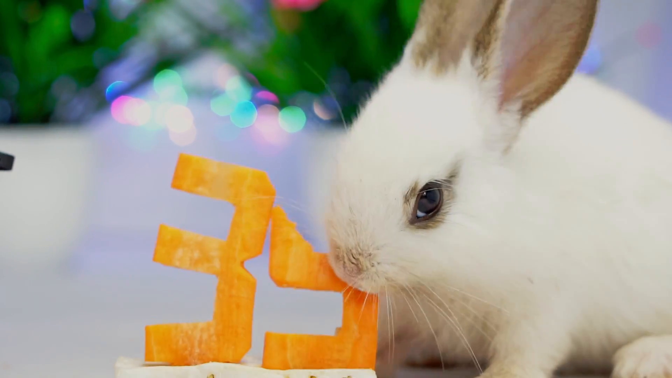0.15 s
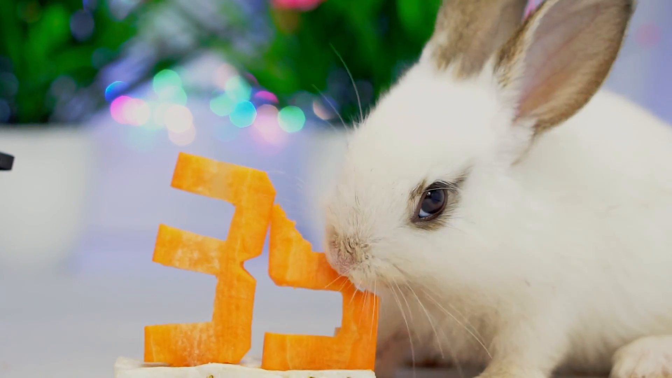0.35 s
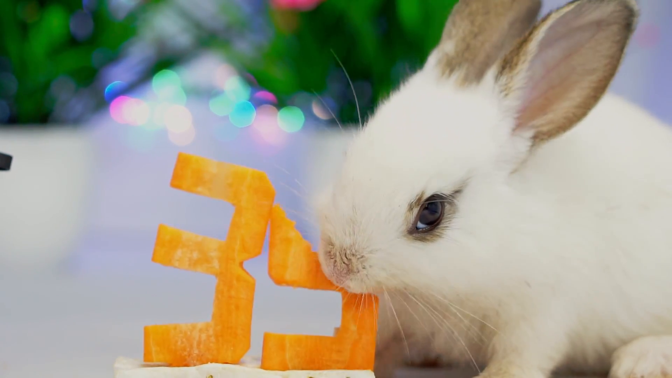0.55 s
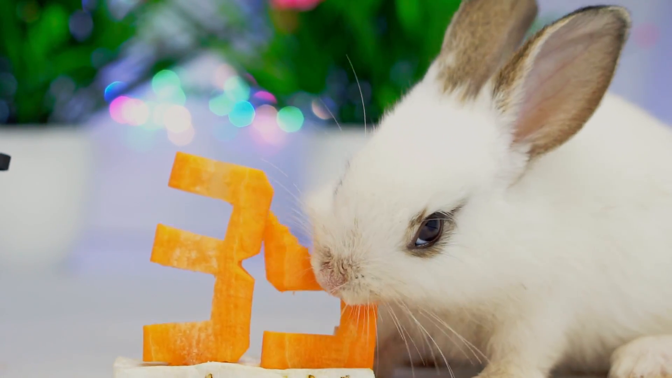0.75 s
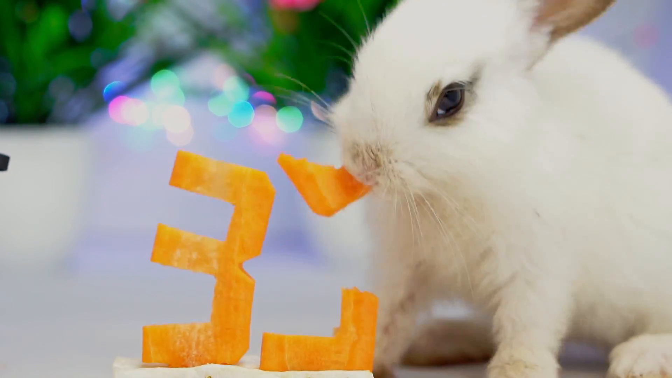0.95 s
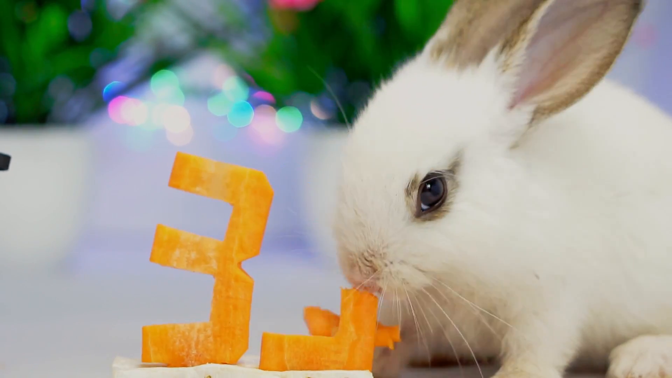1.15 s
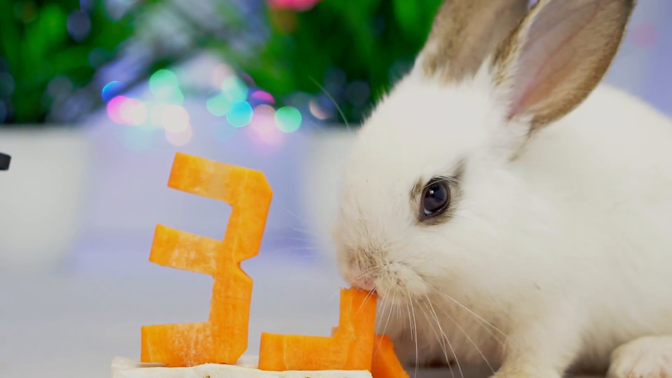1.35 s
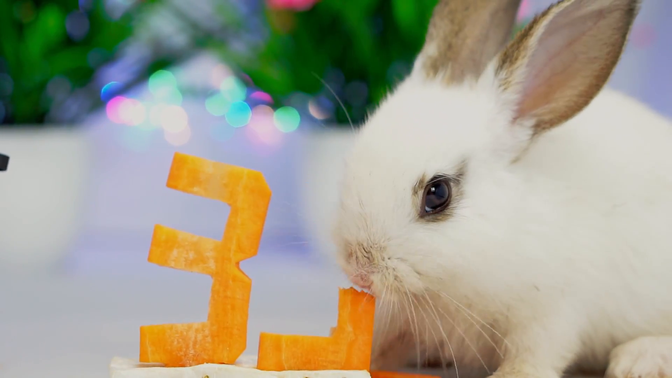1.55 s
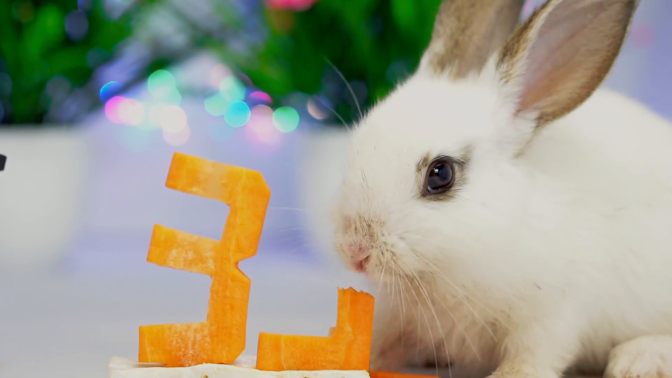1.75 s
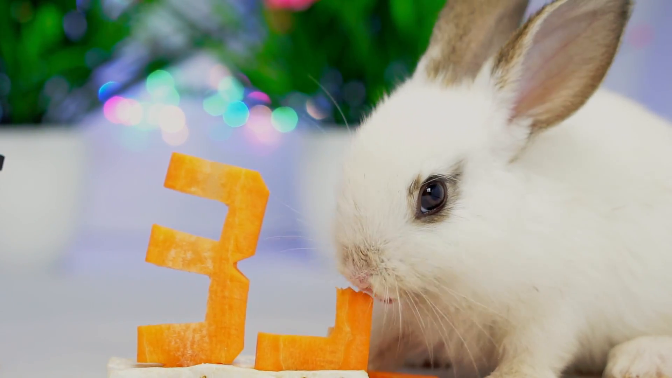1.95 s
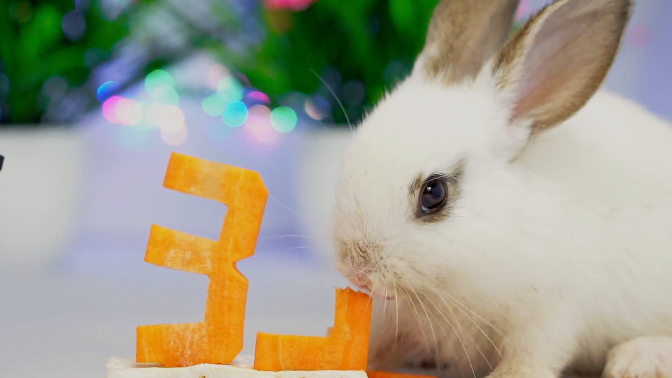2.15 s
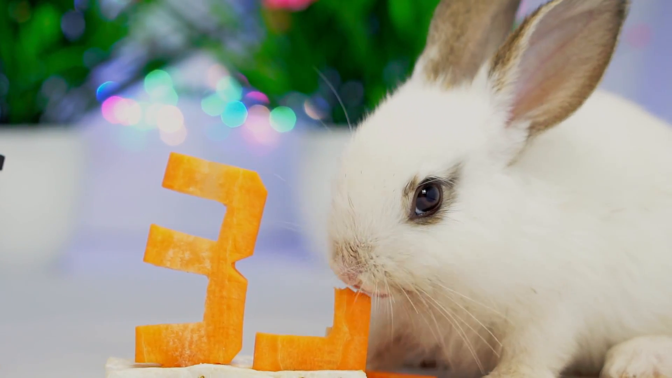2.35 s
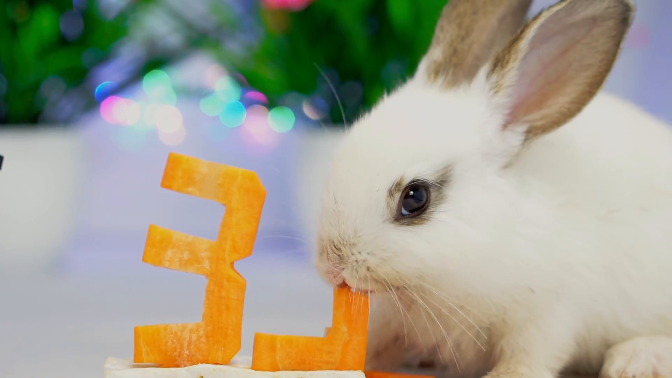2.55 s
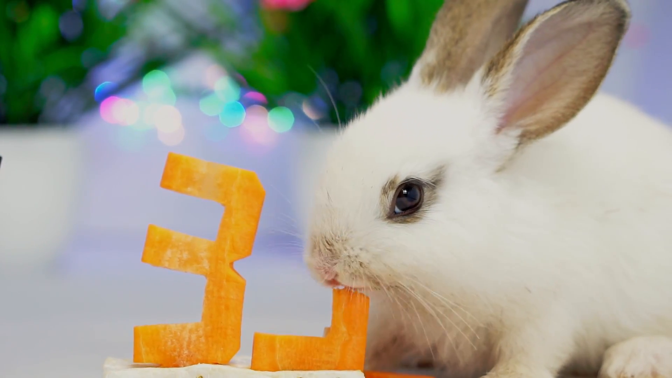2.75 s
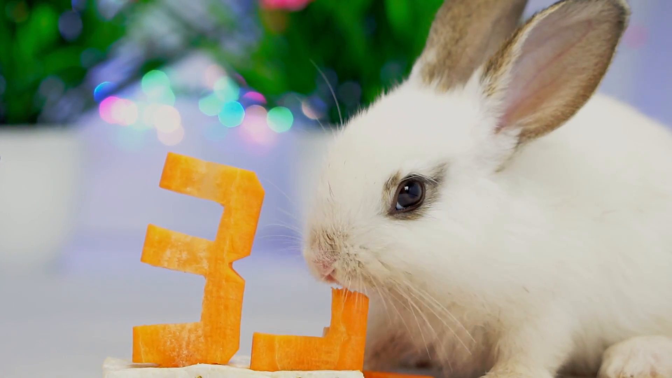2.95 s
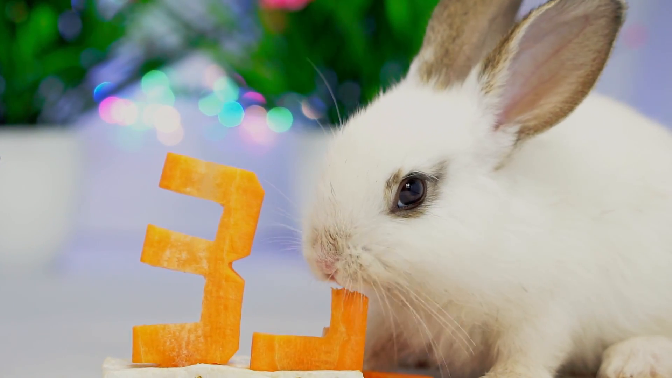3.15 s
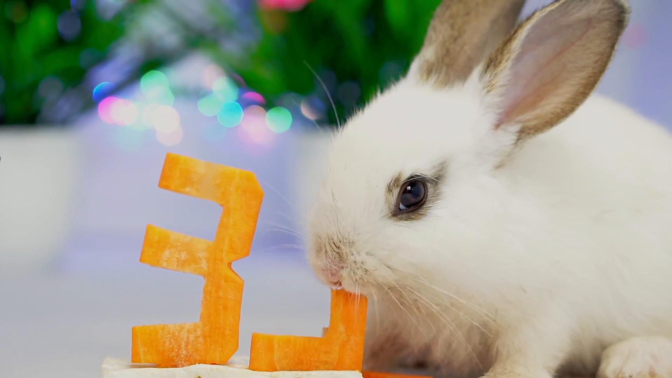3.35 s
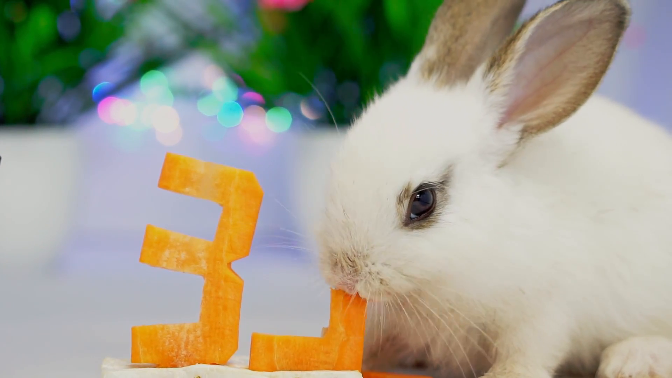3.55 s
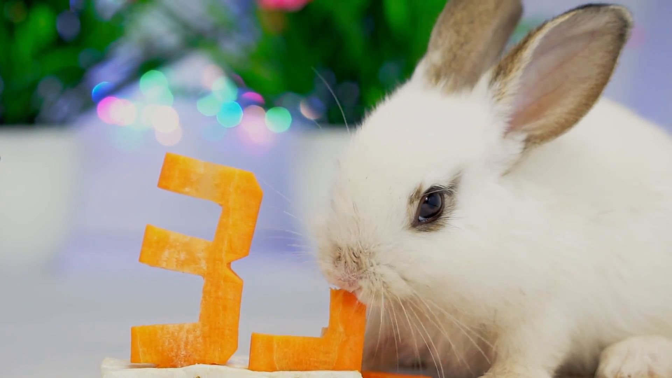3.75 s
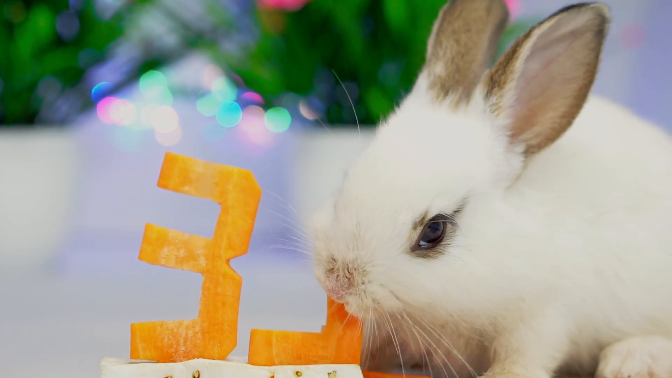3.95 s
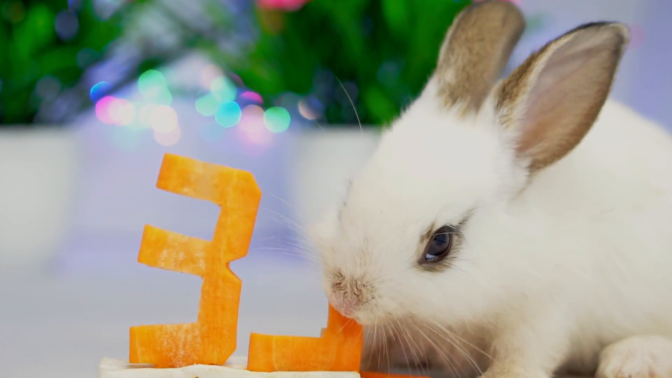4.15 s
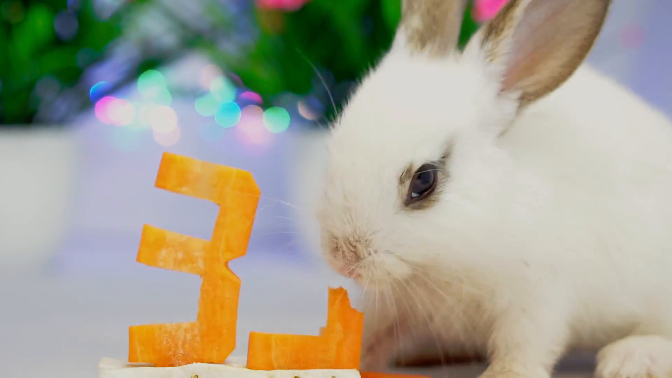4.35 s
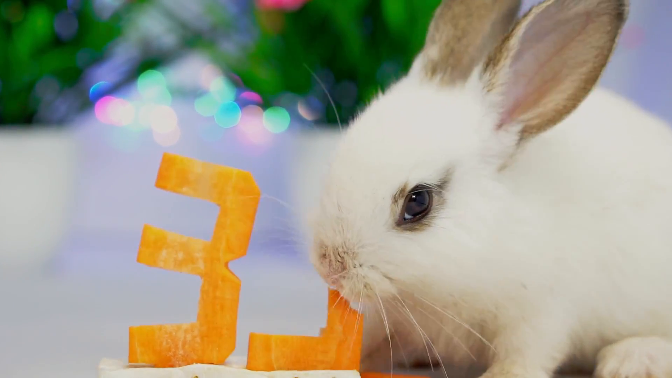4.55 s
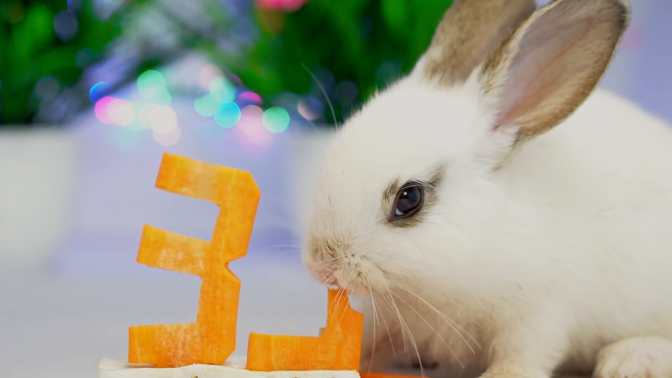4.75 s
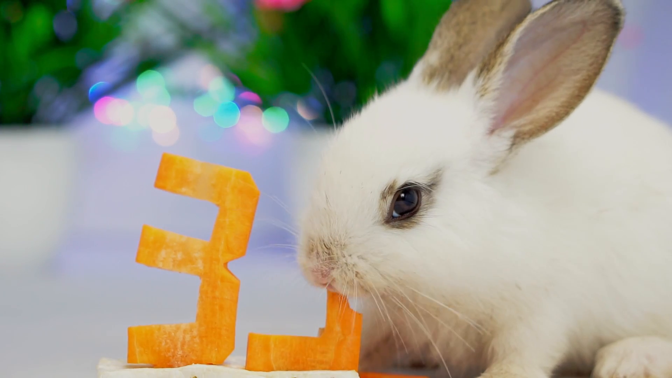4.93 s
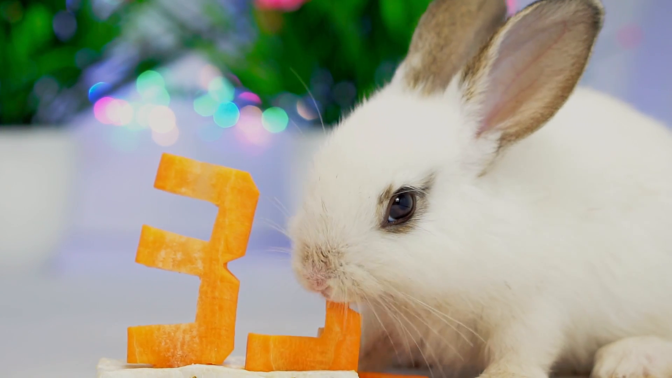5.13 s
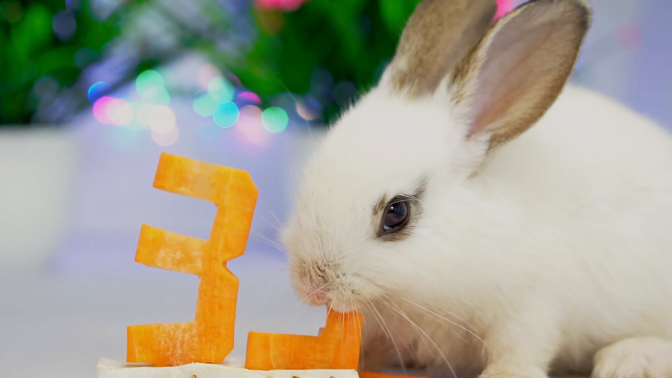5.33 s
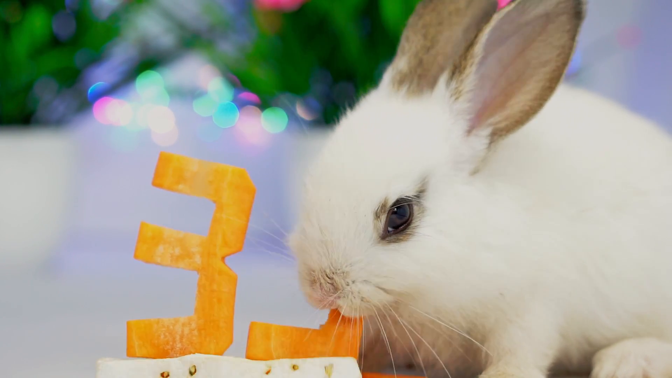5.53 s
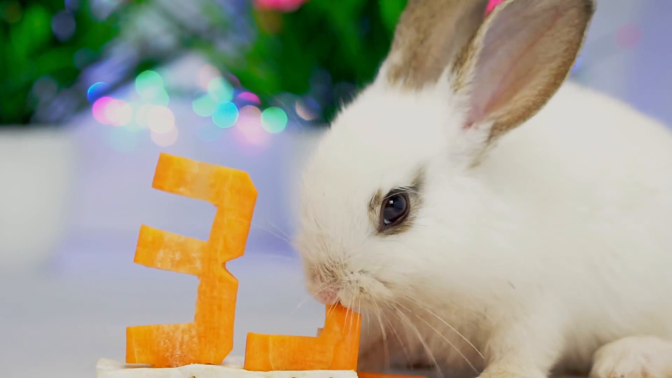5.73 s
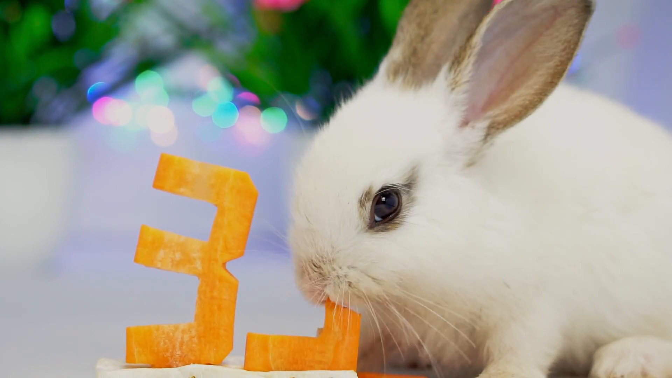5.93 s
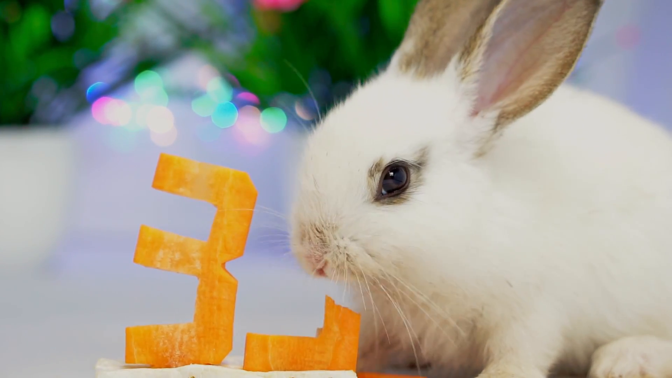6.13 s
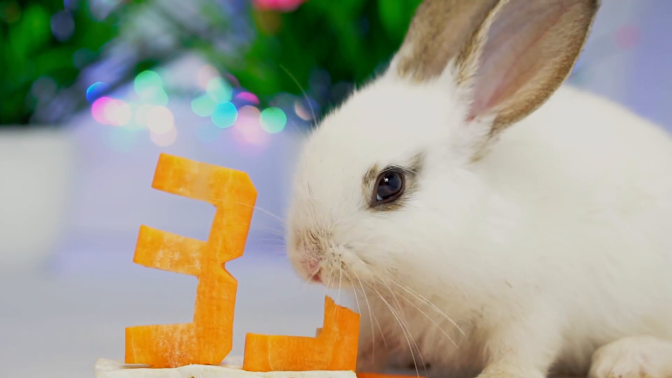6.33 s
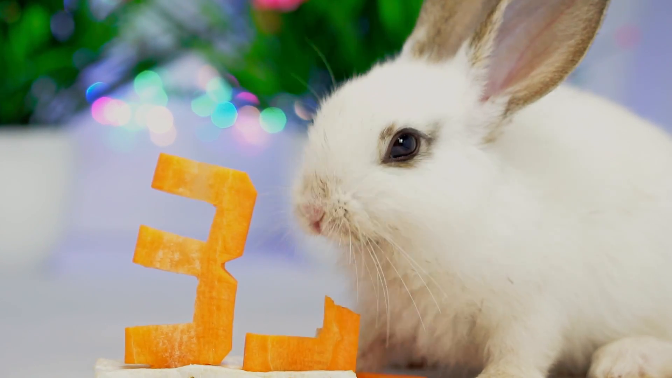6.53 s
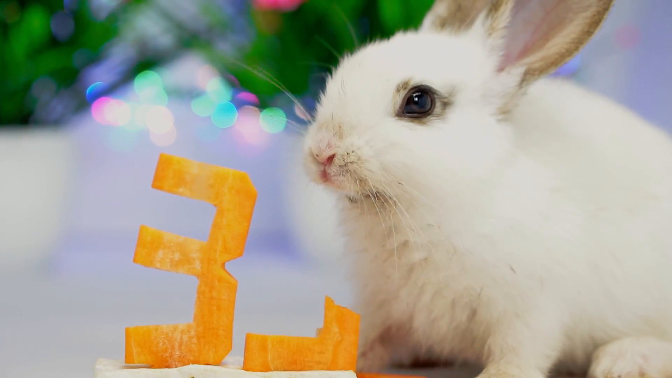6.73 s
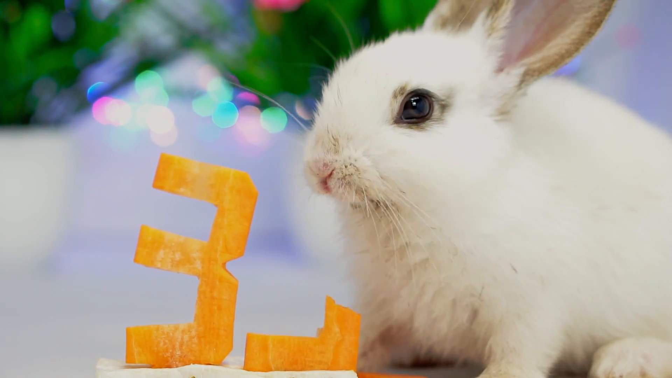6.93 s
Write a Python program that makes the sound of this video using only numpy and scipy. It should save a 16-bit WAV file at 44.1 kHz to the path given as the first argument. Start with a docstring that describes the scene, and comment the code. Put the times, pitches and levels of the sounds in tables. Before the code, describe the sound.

Irregular crisp carrot snaps with low board thumps alternate with quick, dull, moist chewing strokes, close and dry, in a quiet softly humming room.

```python
"""Rabbit biting a raw carrot

The carrot stands on a board, a hand's width from one microphone. Bites crack and tear it as noise
bursts and dense grit; tugs jolt the board into a low ring of decaying sines. Molar strokes, mostly
between bites, are grit ringing mouth resonances, with juice hiss. A faint hum of narrow noise bands,
a sine and a broad murmur fills the room. Only the left channel is wired; the hardest bites clip it."""
import sys
import numpy as np
from scipy import signal
from scipy.fft import rfft, irfft, next_fast_len
from scipy.io import wavfile
from scipy.ndimage import uniform_filter1d

SR = 44100
rng = np.random.default_rng(int(sys.argv[2]) if len(sys.argv) > 2 else 0)


def wrap_up_sound(samples):
    """Save the sound to the file named by the first command line argument, as 16-bit audio."""
    columns = np.atleast_2d(samples).T
    # keep every value between -1 and 1, then stretch to whole-number steps
    tamed = np.clip(columns, -1, 1)
    steps = np.round(tamed * 32767).astype(np.int16)
    wavfile.write(sys.argv[1], SR, steps)


N = 308259  # length in samples


def undb(db):
    """Turn dB into gain."""
    return 10 ** (np.asarray(db) / 20)


def unit(x):
    """Scale to rms 1."""
    return x / np.sqrt(np.mean(x ** 2))


def band(x, hz, width):
    """Two-pole resonance, gain 1 at the centre."""
    hz = np.clip(hz, 20, .42 * SR)
    b, a = signal.iirpeak(hz, hz / np.clip(width, 1, SR / 3), SR)
    return signal.lfilter(b, a, x)


def colour(x, points):
    """Shape a spectrum by (Hz, dB) points, joined by lines over log frequency."""
    hz, db = np.transpose(points)
    size = next_fast_len(len(x))
    freqs = np.maximum(np.arange(size // 2 + 1) * SR / size, 1)
    gain = undb(np.interp(np.log(freqs), np.log(hz), db))
    return irfft(rfft(x, size) * gain, size)[:len(x)]


def grit(size, burst_db, smear_s):
    """Noise of bursting cells: grains of very uneven size, smeared into each other."""
    hold = max(int(smear_s * SR), 1)
    sizes = undb(burst_db * np.minimum(rng.exponential(size=size // hold + 1), 3.5))
    envelope = uniform_filter1d(np.repeat(sizes, hold)[:size], hold)
    return unit(rng.standard_normal(size) * envelope)


def add(out, start_s, x):
    """Mix x into out from a start time."""
    i = max(int(start_s * SR), 0)
    out[i:i + len(x)] += x[:N - i]


def hum():
    """One steady and several wavering low tones over the broad murmur of the room."""
    # wavering tones, noise through narrow bands: centre_hz [Hz], width_hz of the narrower filter [Hz],
    # level_db [dB rms before the mic gain]
    waver_bands = [(105.05, 4, -55.5), (119.1, 4, -54), (161.9, 4.2, -59), (229, 3.8, -63.5),
                   (301, 5, -69.5), (346, 10, -67), (369, 8, -76), (902, 46, -72)]
    # steady sine: pitch_hz [Hz], level_db [dB rms before the mic gain]
    drone_hz, drone_db = (162, -51)
    # tone of the murmur: freq_hz [Hz], density_db [relative dB per Hz]
    murmur_curve = [(15, -37), (25, -15), (53, -10.5), (96, -11), (161, -1.5), (210, -13), (324, -15),
                    (485, -24.5), (1090, -35), (2580, -46.5), (7800, -46), (15700, -45.5)]
    murmur_db = -53.5

    tones = np.zeros(N)
    for hz, width, db in waver_bands:
        narrow = band(rng.standard_normal(N), hz, width)
        tones += undb(db) * unit(band(narrow, hz, 3 * width))
    drone = undb(drone_db) * unit(np.sin(2 * np.pi * drone_hz * np.arange(N) / SR))
    murmur = undb(murmur_db) * unit(colour(rng.standard_normal(N), murmur_curve))
    return drone + tones + murmur


def room(x):
    """A short dull tail from the walls: decaying filtered noise, convolved with the sound."""
    t60_s, tail_db, tone_hz = 0.24, -23, 2500
    t = np.arange(SR // 2) / SR
    fade_in = np.minimum(t / 0.0023, 1)
    noise = band(rng.standard_normal(len(t)), tone_hz / 3, tone_hz)
    tail = noise * 1000. ** (-t / t60_s) * fade_in
    return undb(tail_db) * signal.fftconvolve(x, tail / np.sqrt(np.sum(tail ** 2)))[:N]


def board(force):
    """The board on its table rings in its modes, a sum of decaying sines, when it is pushed."""
    # modes: pitch_hz [Hz], swing [relative gain, sign is direction], t60_s [s];
    # the close modes near 100 Hz cancel at first, so that ring swells late
    board_modes = [(30.9, -.086, .26), (58.6, .023, .63), (81.1, .379, .067), (98.35, -1.206, .126),
                   (101.07, 1.577, .131), (104.4, -.357, .331), (154, -.027, .29), (197, -.081, .03),
                   (231, .02, .15), (290, -.02, .12), (335, .03, .08), (380, -.03, .08), (435, .05, .09),
                   (495, -.04, .1), (680, .025, .08), (765, -.02, .1), (960, .015, .08)]
    t = np.arange(SR) / SR
    ring = sum(swing * np.sin(2 * np.pi * hz * t) * 1000. ** (-t / t60) for hz, swing, t60 in board_modes)
    return signal.fftconvolve(force, ring)[:N]


def jolts():
    """A tug presses the board down for a moment, then lets it swing and rattle on the table."""
    # tugs that jolt the board: start_s [s], strength_db [relative dB], push_s [s]
    tugs = [(0.0865, 5.5, 0.0026), (0.9483, 12.5, 0.0041), (1.181, -8, 0.0026), (1.196, -7, 0.003),
            (1.239, -21, 0.0018), (1.273, -25, 0.0018), (1.294, -14, 0.002), (1.393, -21.5, 0.0022),
            (1.592, -25, 0.002), (4.013, -14, 0.001), (4.052, -7, 0.0052), (4.34, 5.5, 0.0032),
            (5.111, -20, 0.0064), (5.606, 4, 0.0097)]
    force, shake = np.zeros((2, N))
    t = np.arange(SR // 2) / SR
    for start_s, db, push_s in tugs:
        push = np.hanning(max(int(push_s * SR), 8))
        add(force, start_s, -undb(db) * push / push.sum())
        add(shake, start_s, undb(db) * 1000. ** (-t / 0.9))
    loose_grit = band(band(grit(N, 4.9, .006), 170, 160), 200, 300)
    rattle = undb(-45) * shake * loose_grit
    return board(force + rattle)


def chewing():
    """Molars slide over pulp: dull grit rings the mouth, with a hiss of squeezed juice."""
    # molar strokes: start_s [s, nominal], length_s [s], grind_db [relative dB],
    # grind_hz [Hz, centre 0.4 of the way through], hiss_db [relative dB]
    strokes = [(0.235, .15, -48, 2100, -52), (0.445, .13, -40, 2200, -61), (0.668, .055, -44.5, 1540, -53),
               (1.522, .11, -40, 1250, -62.5), (1.728, .13, -42.5, 1120, -66.5),
               (1.915, .1, -45.5, 1010, -64.5), (2.079, .115, -48, 900, -71), (2.257, .12, -40, 1080, -65),
               (2.437, .12, -50, 1054, -70), (2.625, .115, -46.5, 1650, -57),
               (2.811, .11, -45.5, 1050, -58.5), (2.991, .115, -44.5, 708, -64),
               (3.169, .125, -41.5, 960, -57.5), (3.375, .125, -47, 950, -62),
               (3.561, .12, -41, 833, -65.5), (3.779, .14, -48.5, 1107, -64.5),
               (4.504, .15, -38.5, 2360, -51.5), (4.73, .12, -48, 1090, -69.5), (4.919, .1, -46, 1540, -63),
               (5.757, .14, -46.5, 2190, -51), (5.945, .15, -45.5, 2000, -58.5),
               (6.166, .11, -46.5, 1054, -65.5), (6.323, .14, -42, 1070, -65), (6.53, .13, -43.5, 732, -61),
               (6.726, .115, -49, 1064, -67), (6.928, .11, -52, 1090, -64)]
    # mouth resonances: centre_hz [Hz], width_hz of the wider filter [Hz], level_db [relative dB]
    mouth_modes = [(775, 240, 1), (1054.5, 300, 4), (1310, 390, -13), (1532, 160, -3.5), (1990, 360, -2.5),
                   (2626, 430, -9), (3046, 360, -11.5)]
    # tone of the juice hiss: freq_hz [Hz], density_db [relative dB per Hz]
    juice_curve = [(3600, -36), (4300, -6.5), (4700, 1), (5200, -6), (6500, -2.5), (9000, -1.5),
                   (12000, -4.5), (13500, -17), (16000, -25)]
    # juice squeezed harder hisses higher; ref_hz holds at ref_db
    ref_hz, ref_db, oct_per_db = 6800, -62, .06

    out = np.zeros(N)
    dull = grit(N, 4.5, .008)
    wet = unit(colour(grit(N, 3.4, 0.0015), juice_curve))
    mouth_rings = [unit(band(band(dull, hz, width), hz, 0.66 * width)) for hz, width, _ in mouth_modes]
    for start_s, length_s, grind_db, grind_hz, hiss_db in strokes:
        i = int(start_s * SR)
        u = np.linspace(0, 1, int(length_s * SR))  # progress through the stroke
        # the jaw closes fast and eases off slowly
        swell = np.sin(np.pi * u ** 0.62) ** 1.9
        # the closing mouth favours higher and higher resonances
        centre = grind_hz * 2 ** (.6 * (u - .4))
        grind = np.zeros(len(u))
        for (mode_hz, _, mode_db), ring in zip(mouth_modes, mouth_rings):
            octaves_off = abs(np.log2(mode_hz / centre))
            grind += undb(mode_db - 11 * octaves_off) * np.resize(ring[i:], len(u))
        add(out, start_s - .015, undb(grind_db - 9.5) * swell * grind)

        hiss_hz = ref_hz * 2 ** (oct_per_db * (hiss_db - ref_db))
        hiss = band(np.resize(wet[i:], len(u)), hiss_hz, 0.5 * hiss_hz)
        hiss = unit(band(hiss, hiss_hz, 3.6 * hiss_hz))
        add(out, start_s - .002, undb(hiss_db) * swell ** 1.2 * hiss)
    return out


def tearing():
    """Cells burst in dense runs while the teeth are in the carrot, hardest during a scrape."""
    # flesh tearing, one curve per mouthful: time_s [s], fizz_db [dB], crunch_db [dB], before the mic gain
    mouthfuls = [
        [(0.0, -48, -57), (0.138, -44, -63), (0.262, -66, -61), (0.404, -72, -80), (0.78, -75, -75)],
        [(0.775, -66, -62), (0.861, -58, -53), (0.9, -66, -70), (0.987, -46.5, -61), (1.13, -59, -57),
         (1.201, -57, -53), (1.261, -56, -62), (1.36, -52, -52), (1.5, -78, -85)],
        [(3.945, -60, -66), (4.056, -44, -70), (4.186, -66, -68), (4.326, -46, -49), (4.436, -53, -66),
         (4.556, -62, -62), (4.68, -69, -75)],
        [(5.03, -76, -68), (5.09, -68, -59), (5.154, -62.5, -66), (5.284, -65.5, -62), (5.384, -59, -67),
         (5.494, -59.5, -62), (5.65, -49, -61), (5.776, -62, -62), (5.95, -70, -77)],
    ]
    # incisors scraping through flesh: start_s [s], length_s [s], rise [share of the length spent swelling],
    # fizz_db [dB at the peak, before the mic gain], crunch_db [likewise]
    scrapes = [(0.055, 0.052, 0.47, -30, -50), (0.79, 0.12, 0.13, -45, -42), (0.904, 0.058, 0.96, -36, -43),
               (0.947, 0.038, 0.13, -33, -23), (1.368, 0.033, 0.3, -24.5, -43),
               (4.003, 0.088, 0.13, -47, -33), (4.268, 0.062, 0.38, -42, -48),
               (4.309, 0.074, 0.4, -35, -35), (4.505, 0.061, .3, -57, -49), (5.092, 0.1, 0.24, -50, -41),
               (5.29, 0.055, 0.16, -45, -28), (5.322, 0.056, 0.44, -32, -38.5),
               (5.5, 0.11, 0.14, -42.5, -44), (5.577, .03, 0.71, -39, -50), (5.6, 0.063, .08, -37, -40)]
    # tone of the fizz: freq_hz [Hz], density_db [relative dB per Hz]
    fizz_curve = [(1470, -37), (2500, -15), (3010, -10), (3510, -13.5), (5070, -2.5), (5520, 3),
                  (12500, 3.5), (15700, -5)]

    fizz = unit(colour(grit(N, 3.6, .0012), fizz_curve))
    crunch = unit(band(band(grit(N, 3.5, 0.0027), 1000, 2200), 1300, 2800))
    t = np.arange(N) / SR
    fizz_gain, crunch_gain = np.zeros((2, N))
    for time_s, fizz_db, crunch_db in map(np.transpose, mouthfuls):
        inside = (t >= time_s[0]) & (t <= time_s[-1])
        fizz_gain += inside * undb(np.interp(t, time_s, fizz_db))
        crunch_gain += inside * undb(np.interp(t, time_s, crunch_db))
    for start_s, length_s, rise, fizz_db, crunch_db in scrapes:
        u = np.linspace(0, 1, max(int(length_s * SR), 8))
        swell = np.interp(u, [0, np.clip(rise, .02, .98), 1], [0, 1, 0]) ** 2.4
        add(fizz_gain, start_s, undb(fizz_db) * swell)
        add(crunch_gain, start_s, undb(crunch_db) * swell)
    return fizz * fizz_gain + crunch * crunch_gain


def burst(noise, t60, hz, width, strike):
    """A sharp first strike and a quick spit of noise, ringing around hz; peak 1."""
    t = np.arange(len(noise)) / SR
    force = noise * 1000. ** (-t / t60) * np.minimum(t / (.03 * t60), 1)
    force[0] += strike
    spit = band(band(force, hz, width), hz, 2.0 * width)
    return spit / np.abs(spit).max()


def cracks():
    """Each crack is a bright spit, a snap of the carrot's body and a knock that rumbles on and rings the board."""
    # cracks and knocks heard singly: start_s [s], spit_db [dB peak before the mic gain], spit_hz [Hz],
    # snap_db [dB peak before the mic gain], snap_hz [Hz], knock_db [relative dB]
    breaks = [(0.057, -17, 12600, -36, 3240, -52), (0.084, -6, 8400, -11.5, 2440, -16),
              (0.1112, -35, 10300, -35, 1483, -44), (0.129, -25.5, 8650, -42, 1820, -31),
              (0.1576, -25, 11600, -45, 1630, -39), (0.455, -36, 6000, -33, 2120, -46),
              (0.5713, -31, 12900, -70, 1110, -69), (0.5996, -40, 10800, -69, 1160, -66),
              (0.802, -23, 12400, -29, 1100, -35), (0.9387, -25, 10800, -34.5, 1693, -48),
              (0.9472, -3, 7570, -3, 3500, -13.5), (0.95, -1, 11500, -13, 3180, -18.5),
              (1.0131, -29, 8470, -43, 3880, -33), (1.099, -55, 9000, -55, 1100, -33),
              (1.126, -55, 9000, -55, 1100, -34), (1.151, -35, 11300, -42, 2100, -40),
              (1.1832, -13.5, 9420, -23, 2800, -30), (1.1978, -24, 10800, -26.5, 2040, -36),
              (1.2428, -25, 11600, -26, 2300, -22), (1.27, -18.5, 9330, -26, 1890, -26),
              (1.2981, -22.5, 9180, -21, 1540, -22), (1.3147, -24, 11100, -27, 2900, -29),
              (1.331, -33, 10900, -36, 1200, -40), (1.348, -28, 11000, -34, 1200, -36),
              (1.3785, -35, 7310, -20, 3320, -47), (1.39, -23, 7790, -36, 1100, -23),
              (1.5883, -48.5, 5920, -8, 1300, -13), (1.71, -54.5, 7120, -36, 1080, -59),
              (2.2671, -52, 6230, -32, 1080, -52), (3.9875, -24.5, 5750, -25.5, 1507, -31),
              (4.009, -11.5, 7620, -8, 2700, -17), (4.0484, -13.5, 8680, -19, 2500, -29),
              (4.1001, -32, 9730, -40.5, 1357, -47), (4.2667, -20.5, 9010, -9, 1800, -20),
              (4.3095, -23, 7500, -38, 2620, -42), (4.3135, -22.5, 10600, -34, 2290, -31),
              (4.336, -5, 9430, -7, 2260, -14), (4.3786, -23, 11100, -41.5, 1190, -32),
              (4.4594, -37, 6500, -48, 1600, -36), (4.478, -35, 8500, -60, 1140, -60),
              (4.5256, -24.5, 8440, -18, 2300, -43), (4.95, -60, 8000, -55, 1500, -40),
              (5.103, -37, 5860, -25.5, 2600, -32), (5.2258, -36.5, 9190, -70, 1940, -55),
              (5.2912, -29, 7210, -21, 1300, -25), (5.3008, -25.5, 6620, -24, 1600, -40),
              (5.3225, -25, 7100, -21, 3030, -28), (5.326, -19.5, 10500, -38, 1580, -39),
              (5.3467, -31, 9610, -24, 2730, -50), (5.4034, -30, 10300, -51.5, 1080, -46),
              (5.434, -31.5, 10800, -53, 1018, -65), (5.506, -17.5, 6150, -24, 1380, -22),
              (5.5145, -19.5, 8050, -17.5, 1330, -17), (5.6102, -5.5, 7220, -10.5, 2420, -12.5),
              (5.683, -39, 6200, -65, 2200, -60), (5.7367, -40, 7710, -49, 2200, -45),
              (5.8096, -35, 7500, -55, 2290, -65)]
    # a harder knock is higher in pitch; base_hz holds at 0 dB, before the random scatter
    base_hz, oct_per_db, scatter_oct = 580, .024, .12
    # the rough tail that follows a knock
    rumble_db, rumble_hz, rumble_t60_s = -11, 250, .16

    air, knock, rumble = np.zeros((3, N))
    noises = rng.standard_normal((len(breaks), 4, 4096))
    for (start_s, spit_db, spit_hz, snap_db, snap_hz, knock_db), noise in zip(breaks, noises):
        # a bigger break splits more fibres and lasts longer
        spit_t60 = .03 * undb(.4 * spit_db)
        spit = burst(noise[0], spit_t60, spit_hz, .6 * spit_hz, strike=1.5)
        add(air, start_s, undb(spit_db) * spit)

        snap = burst(noise[1], 0.019, snap_hz, .48 * snap_hz, strike=6.8)
        add(air, start_s, undb(snap_db) * snap)

        knock_hz = base_hz * 2 ** (oct_per_db * knock_db + scatter_oct * noise[2, -1])
        thump = burst(noise[2], .006, knock_hz, 0.6 * knock_hz, strike=40.)
        add(knock, start_s, undb(knock_db) * thump)

        tail = burst(noise[3], rumble_t60_s, rumble_hz, rumble_hz, strike=0)
        add(rumble, start_s, undb(knock_db + rumble_db) * tail)
    return air + undb(3) * knock + rumble + undb(-15.5) * board(knock)


def scene():
    """All at one microphone, on the left; the right channel is silent."""
    bites = cracks() + chewing() + tearing()
    left = bites + room(bites) + jolts() + hum()
    return np.array([left, np.zeros(N)])


def record(dry):
    """The input clips at full scale and a steep low-pass cuts the top."""
    mic_gain_db, top_hz = 4.5, 15875
    loud = np.clip(undb(mic_gain_db) * dry, -1, 1)
    low_pass = signal.ellip(8, .2, 70, top_hz, fs=SR, output="sos")
    return np.clip(signal.sosfilt(low_pass, loud), -1, 1)


dry = scene()
out = record(dry)
wrap_up_sound(out)
```